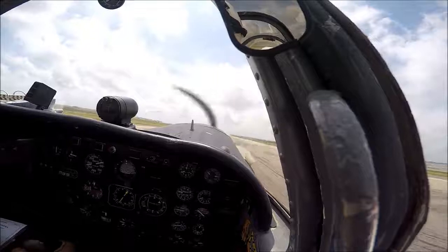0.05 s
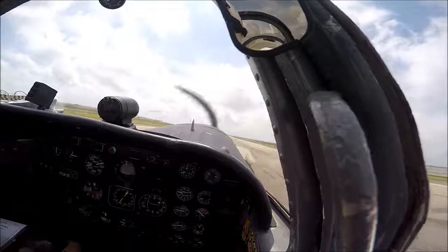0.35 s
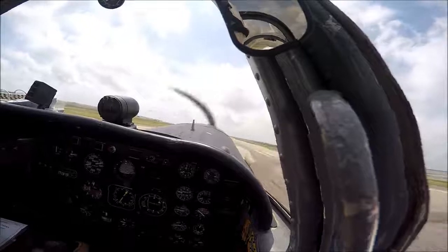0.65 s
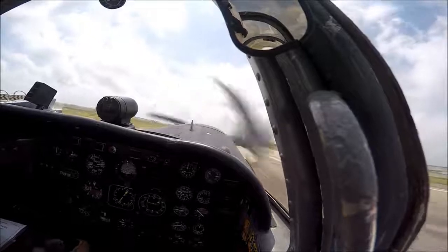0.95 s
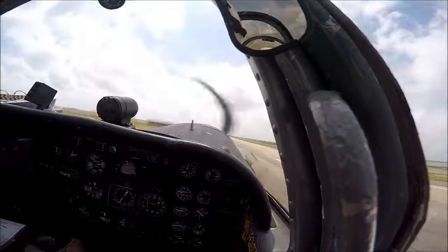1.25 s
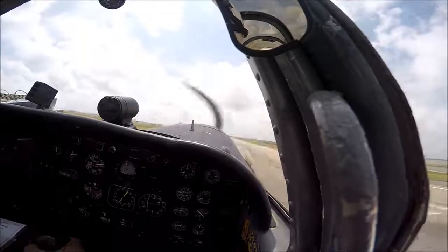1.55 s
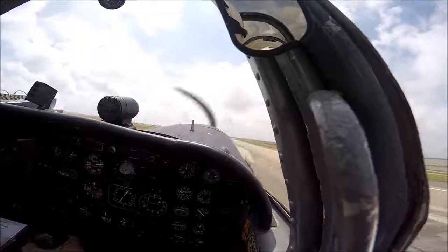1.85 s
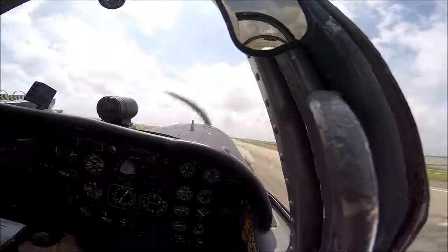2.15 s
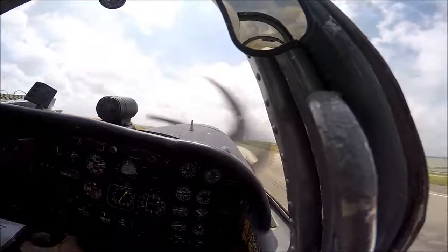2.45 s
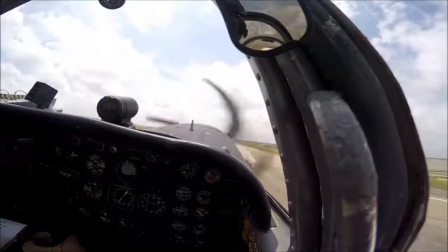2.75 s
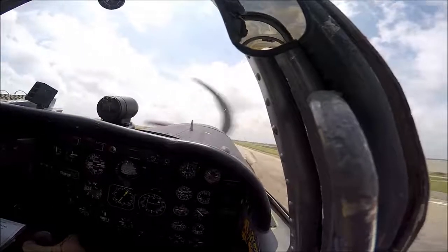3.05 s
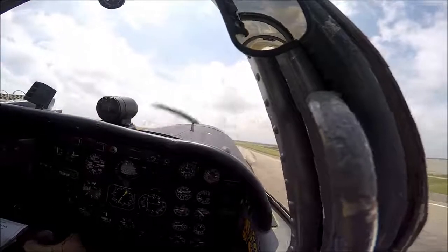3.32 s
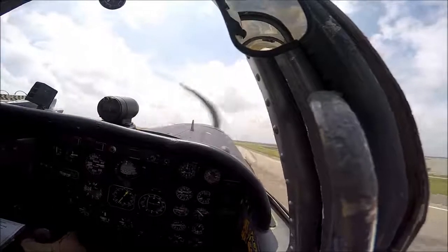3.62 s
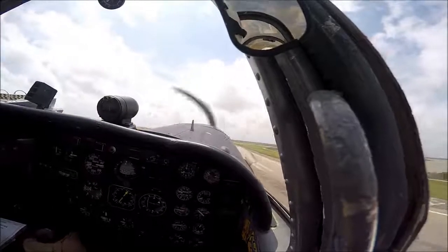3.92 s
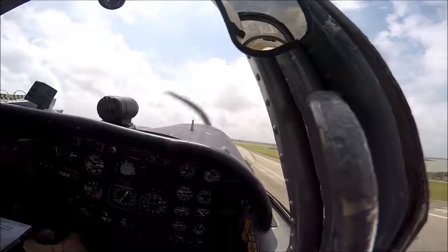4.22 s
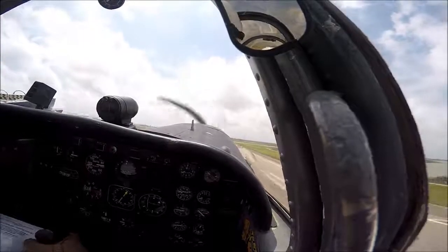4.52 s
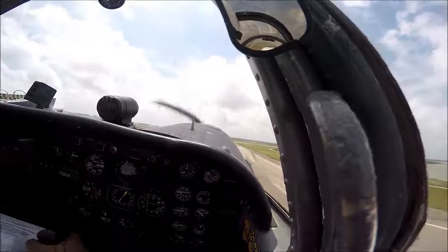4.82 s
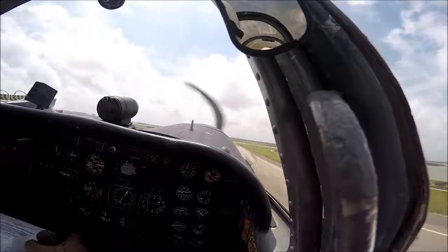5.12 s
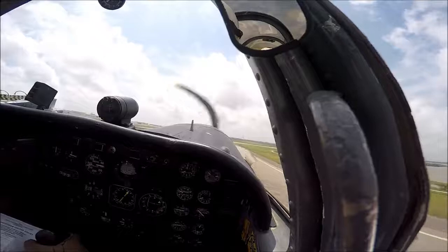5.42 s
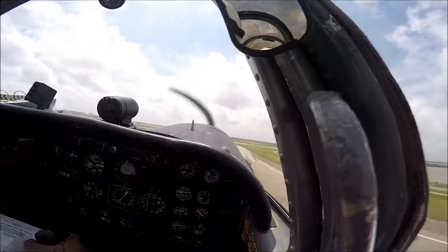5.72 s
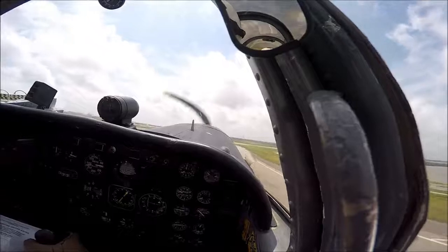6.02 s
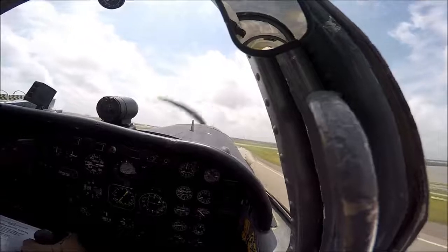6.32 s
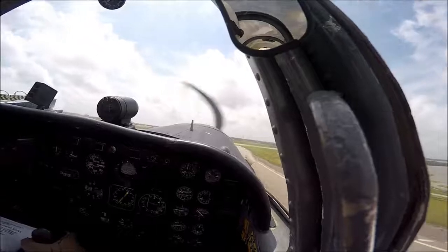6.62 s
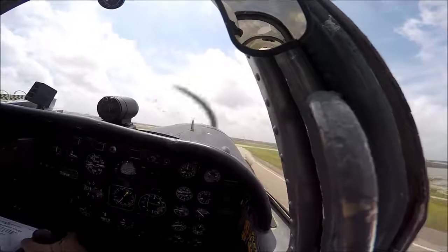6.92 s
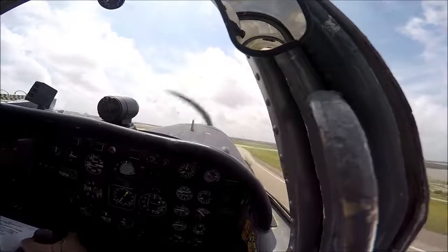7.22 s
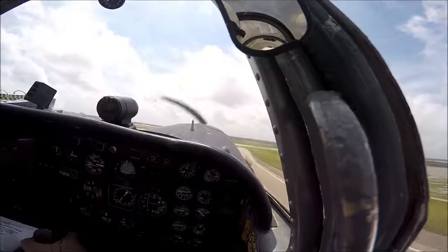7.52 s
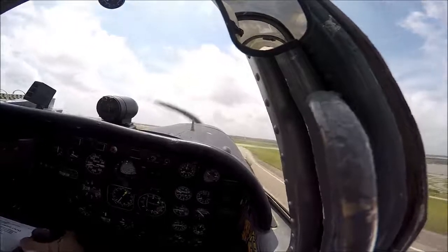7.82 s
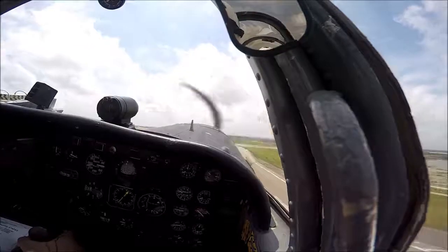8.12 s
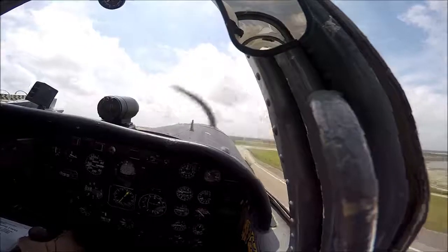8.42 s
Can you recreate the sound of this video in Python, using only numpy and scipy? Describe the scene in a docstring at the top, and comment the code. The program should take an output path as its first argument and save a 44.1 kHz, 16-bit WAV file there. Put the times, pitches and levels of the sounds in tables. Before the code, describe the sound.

Inside the closed cockpit of a small turboprop rolling along a runway, the propeller drones at a steady low pitch over a heavy, buffeting cabin rumble. Air rushes around the canopy, with a softer turbine hiss and thin whines above it. A loose fitting gives one metallic tick a little past halfway, and a faint whistle falls near the end while the drone carries on.

```python
"""A three-bladed turboprop drones, heard inside the closed cockpit as the aircraft rolls along a runway.
The blade-passing tone settles to a steady pitch under its governor, while the propeller's wash buffets
the cabin into a low boom. Turbulent air rushes round the canopy, the turbine adds a bright hiss and thin
gear and blade whines, and the wheels rock the airframe. A loose fitting ticks once, and near the end
a faint whistle falls."""
import sys
import numpy as np
from scipy import signal
from scipy.fft import rfft, irfft
from scipy.io import wavfile
from scipy.ndimage import uniform_filter1d

SR = 44100
rng = np.random.default_rng(int(sys.argv[2]) if len(sys.argv) > 2 else 0)


def materialize(psi):
    """Save the field psi as 16-bit PCM at rate SR to the path in sys.argv[1].

    A 1-D psi becomes a single channel; in a 2-D psi each row is a channel.
    """
    bounded = np.clip(np.atleast_2d(psi).T, -1, 1)
    quanta = np.round(bounded * 32767).astype(np.int16)
    wavfile.write(sys.argv[1], SR, quanta)


N = 381906
TIME = np.arange(N) / SR
FREQS = np.maximum(np.fft.rfftfreq(N, 1 / SR), 1)

# blade-passing tone, following the load on the blades: time_s, relative_level_db
BLADE_LOAD = [(0.05, -21), (0.26, -20.5), (0.64, -12), (1.37, -17), (1.44, -14), (2.04, -16), (2.18, -17),
              (3.01, -14), (3.2, -15), (7.43, -15), (7.91, -17.5), (8.55, -15.5)]
# harmonics of the shaft's throb: multiple_of_shaft_speed, relative_level_db
SHAFT_ORDERS = [(1, -43.5), (2, -23), (4, -54), (5, -54.5), (6, -54.5)]
# whine of the reduction gear, following its load: time_s, level_db
GEAR_LOAD = [(0, -47.5), (.7, -45.5), (1.2, -56.5), (2.8, -46.5), (4.4, -54), (5.5, -51), (6.6, -55),
             (8.66, -54)]
# cabin resonances driven by the wash: centre_hz, width_hz, relative_level_db
BUFFET_MODES = [(50.7, 9.6, -0.5), (73.8, 31, 0.5), (97, 42, -7)]
# lulls in the buffeting: centre_s, drop_db
LULLS = [(.62, 3.5), (1.1, 2.5), (2.8, 5), (4.2, 2), (5.22, 3), (6.82, 3.5), (8.2, 2)]
# resonances of the cabin air: centre_hz, width_hz, relative_level_db
BOOM_MODES = [(129.5, 20, -15), (149.3, 21.4, -6.5), (170, 18, -11.5), (191.8, 25.8, -3)]
# boom, growing unevenly as the aircraft gathers speed: time_s, relative_level_db
BOOM_GROWTH = [(0, -28.5), (1.7, -28), (2.4, -31.5), (3.1, -27.5), (3.7, -29.5), (4.6, -26.5), (6.5, -26.5),
               (7.2, -26), (8.66, -25)]
# gusts that swell the boom: centre_s, lift_db
GUSTS = [(.33, 7.5), (3.25, 8.5), (4.06, 6.5), (5.6, 3.5), (6.31, 4), (8.27, 4), (8.61, 3)]
# low resonance of the airframe: centre_hz, width_hz, relative_level_db
FRAME_MODES = [(21.3, 21, 0)]
# bumps in the runway: peak_s, level_db
BUMPS = [(.1, -17), (6.92, -23)]
# strength of the airflow: time_s, relative_level_db
AIRFLOW = [(0.03, -32), (0.7, -31), (1.01, -34.5), (1.7, -31.5), (2.15, -33.5), (3.16, -31.5), (3.8, -33),
           (4.06, -31), (4.25, -33), (4.59, -31.5), (5.11, -33), (5.42, -30.5), (5.93, -32.5),
           (7.24, -31.5), (7.64, -33), (8.6, -31)]
# broad spectrum of the rushing air, before resonances: frequency_hz, density_db
RUSH_SPECTRUM = [(240, -64), (400, -67), (630, -67.5), (820, -64.0), (1260, -73.0), (2010, -70),
                 (3050, -71.5), (3520, -69), (3680, -77.5), (4050, -83), (5940, -88), (8630, -95.5),
                 (11010, -99), (14540, -107.2)]
# resonances of cabin, canopy and intake: centre_hz, width_hz, lift_db
RUSH_RESONANCES = [(280.3, 24.6, 7), (330, 21, 5.5), (454, 38, 4.5), (1613, 99, 4), (1817, 130, 6),
                   (2118, 58, 7), (2794, 120, 2), (3330, 180, 0.5), (4770, 81, 5.5), (5396, 220, 3.5),
                   (7100, 890, 6.0), (9120, 230, 8.5), (9580, 660, 16.5), (10310, 440, 9.5)]
# power shaft and turbine blade tones at full strength: pitch_hz, level_db, wander_hz
TURBINE_WHINES = [(467, -50.5, 2.2), (545, -49, 1.0), (4163, -68.5, 3), (5352, -73, 3), (5933, -69, 2),
                  (6544, -75, 3), (7139, -75, 3), (11346, -84, 4)]
# the fitting's two contacts: start_s, rattle_db, ring_db, t60_s
CONTACTS = [(5.3455, -42, -60, .1), (5.3612, -38.5, -27, 0.11)]
# spectrum of its rattle: frequency_hz, relative_density_db
RATTLE_SPECTRUM = [(1500, -25), (3000, -4), (5400, 6), (6800, -4), (8000, 0), (11000, -13), (15000, -18)]
# falling whistle: time_s, pitch_hz, level_db
WHISTLE_GLIDE = [(7.8, 3560, -56), (7.92, 3390, -45), (8.01, 3200, -42.5), (8.1, 2900, -42),
                 (8.2, 2640, -44), (8.3, 2510, -47), (8.5, 2450, -56)]


def propeller(blades=3, blade_hz=109.28, gear_teeth=85):
    """Rotation harmonics: blade tone, gear whine and throb lie at whole multiples of the shaft speed."""
    shaft_angle = angle((blade_hz + governor_hunt()) / blades) + 0.0028 * drift(4.3)   # uneven turning
    load_db, = in_time(BLADE_LOAD)
    gear_db, = in_time(GEAR_LOAD)
    blade_tone = from_db(load_db - 0.5) * np.cos(blades * shaft_angle)
    gear_whine = from_db(gear_db) * np.cos(gear_teeth * shaft_angle)
    throb = sum(from_db(db) * np.cos(round(order) * shaft_angle) for order, db in SHAFT_ORDERS)
    return np.sqrt(2) * (blade_tone + gear_whine), np.sqrt(2) * throb


def governor_hunt(swing_hz=0.38, period_s=2.55, settle_s=2.8):
    """Damped oscillation: the governor swings the blade-passing frequency about its set value."""
    return swing_hz * np.exp(-TIME / settle_s) * np.cos(2 * np.pi * TIME / period_s)


def cabin_buffet(throb):
    """Forced vibration: propeller wash and shaft throb shake the cabin unevenly, with brief lulls."""
    wash = from_db(-21.5) * resonating(BUFFET_MODES)
    level_db = -16.5 - swells(LULLS, half_width_s=0.11) + 0.74 * drift(10)
    return from_db(level_db) * steady(throb + wash, 0.2)


def cabin_boom():
    """Cavity resonance: turbulence excites the modes of the enclosed air, more strongly in gusts."""
    growth_db, = in_time(BOOM_GROWTH)
    level_db = growth_db + 0.5 + swells(GUSTS, half_width_s=0.049) + 1.27 * drift(9.2)
    return from_db(level_db) * steady(resonating(BOOM_MODES), 0.11)


def airframe_rumble(rolling_db=-29.5, rise_s=0.2, settle_s=0.4):
    """Base excitation: the wheels rock the airframe; each bump builds quickly and settles slowly."""
    power = from_db(rolling_db) ** 2
    for peak_s, db in BUMPS:
        envelope = np.exp(-np.maximum((peak_s - TIME) / rise_s, (TIME - peak_s) / settle_s))
        power = power + (from_db(db) * envelope) ** 2
    return np.sqrt(power) * steady(resonating(FRAME_MODES), 0.13)


def air_rush(low_hz, high_hz, swell_db, flutter_db):
    """Turbulent flow noise: one band, coloured by resonances, swells about its mean level and flutters."""
    lift_db = sum(db * 2 ** -((2 * (FREQS - hz) / width) ** 2) for hz, width, db in RUSH_RESONANCES)
    band = 1 / np.sqrt((1 + (low_hz / FREQS) ** 16) * (1 + (FREQS / high_hz) ** 16))
    spectrum = from_db(over_hz(RUSH_SPECTRUM) + lift_db) * band
    band_rms = np.sqrt(np.mean(spectrum ** 2) * SR / 2)
    rush = band_rms * steady(noise(spectrum), 0.15)
    return rush * from_db(swell_db - np.mean(swell_db) + flutter_db * drift(15))


def turbine_hiss(flow_db, rise_db_per_s=0.23):
    """Broadband flow noise: the turbine's hiss partly follows the airflow and grows along the roll."""
    swell_db = 0.51 * flow_db + rise_db_per_s * TIME
    return from_db(0.6) * air_rush(8700, 11000, swell_db, flutter_db=1.3)


def turbine_whines(waver_db=0.4, start_db=-7, build_s=1):
    """Line spectrum of rotating parts: thin tones build up, each wavering in pitch and strength."""
    tones = sum(from_db(db + waver_db * drift(3)) * np.sin(angle(hz + wander_hz * drift(2.98)))
                for hz, db, wander_hz in TURBINE_WHINES)
    return np.sqrt(2) * from_db(start_db * np.exp(-TIME / build_s)) * tones


def fitting_tick(ring_hz=3490):
    """Impact and free decay: a loose fitting slips, then snaps home, with a rattle and a metallic ring."""
    rattle = noise(from_db(over_hz(RATTLE_SPECTRUM)))
    tick = np.zeros(N)
    for start_s, rattle_db, ring_db, t60_s in CONTACTS:
        age_s = np.maximum(TIME - start_s, 0)
        decay = (age_s > 0) * from_db(-60 * age_s / t60_s)
        ring = np.sin(2 * np.pi * ring_hz * age_s)
        tick += decay * (from_db(rattle_db) * rattle + from_db(ring_db) * ring)
    return tick


def whistle(spread_hz=45):
    """Random frequency modulation: a tone broadens into a breathy whistle as it slides down and fades."""
    pitch_hz, level_db = in_time(WHISTLE_GLIDE)
    sounding = (TIME > WHISTLE_GLIDE[0][0]) & (TIME < WHISTLE_GLIDE[-1][0])
    return np.sqrt(2) * from_db(level_db) * sounding * np.sin(angle(pitch_hz + spread_hz * drift(89)))


def from_db(db):
    """Amplitude ratio of a level in decibels."""
    return 10 ** (np.asarray(db) / 20)


def in_time(rows):
    """Linear interpolation of each column of a time curve at every sample."""
    times_s, *columns = np.transpose(rows)
    return [np.interp(TIME, times_s, column) for column in columns]


def over_hz(points):
    """Interpolation of a spectrum in dB over log frequency."""
    hz, db = np.transpose(points)
    return np.interp(np.log(FREQS), np.log(hz), db)


def swells(rows, half_width_s):
    """Sum of Gaussian swells in dB, one for each row."""
    return sum(db * 2 ** -(((TIME - centre_s) / half_width_s) ** 2) for centre_s, db in rows)


def angle(hz):
    """Phase in radians as the time integral of frequency."""
    return 2 * np.pi * np.cumsum(hz) / SR


def noise(spectrum):
    """Spectral shaping of white noise, scaled to rms 1."""
    shaped = irfft(rfft(rng.standard_normal(N)) * spectrum, N)
    return shaped / np.sqrt(np.mean(shaped ** 2) + 1e-20)


def drift(rate_hz):
    """Low-pass random fluctuation of rms 1."""
    return noise(1 / (1 + (FREQS / rate_hz) ** 2))


def resonating(modes):
    """Random excitation of steep-sided resonances whose powers add; rms 1."""
    power = sum(from_db(db) ** 2 / (1 + (2 * (FREQS - hz) / width) ** 2) ** 3 for hz, width, db in modes)
    return noise(np.sqrt(power))


def steady(x, span_s):
    """Division by the running rms evens out swells slower than the span."""
    size = int(span_s * SR)
    return x / np.sqrt(uniform_filter1d(uniform_filter1d(x ** 2, size), size) + 1e-12)


def scene():
    """Superposition: all sources add at one microphone inside the cockpit."""
    drone, throb = propeller()
    flow_db, = in_time(AIRFLOW)
    slipstream = air_rush(215, 1375, 1.2 * flow_db, flutter_db=0.6)
    canopy = air_rush(1340, 8350, 0.87 * flow_db, flutter_db=0.42)
    turbine = turbine_hiss(flow_db) + turbine_whines()
    seal_leaks = air_rush(11100, 18000, flow_db, flutter_db=1.0)
    rumble = cabin_buffet(throb) + cabin_boom() + airframe_rumble()
    return (drone + rumble + slipstream + canopy + turbine + seal_leaks + whistle() + fitting_tick())[None]


def record(dry):
    """Band limiting: the microphone drops the deepest rumble, and a steep low-pass cuts the top."""
    high_pass = signal.butter(2, 12, "high", fs=SR, output="sos")
    low_pass = signal.ellip(10, 0.1, 80, 15300, fs=SR, output="sos")
    return signal.sosfilt(low_pass, signal.sosfilt(high_pass, dry))


dry = scene()
out = record(dry)
materialize(out)
```